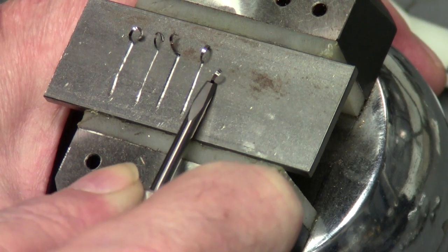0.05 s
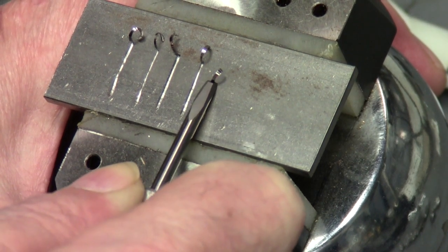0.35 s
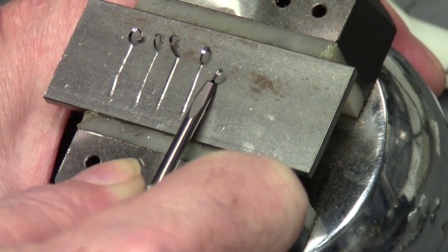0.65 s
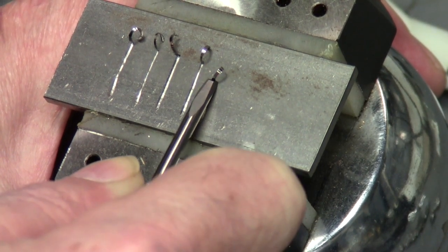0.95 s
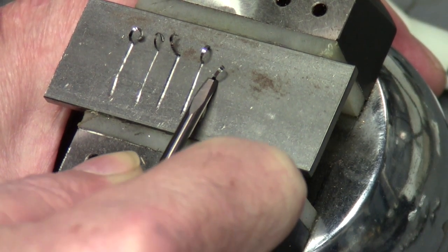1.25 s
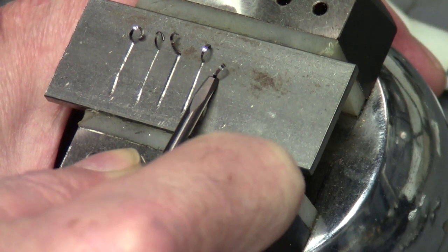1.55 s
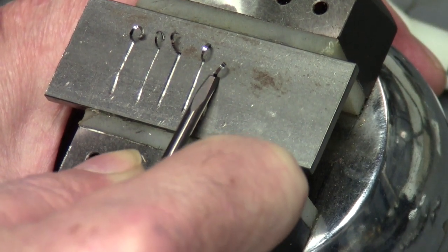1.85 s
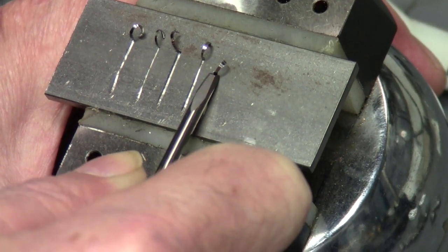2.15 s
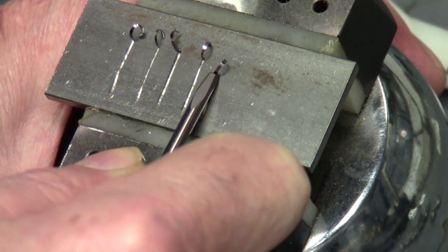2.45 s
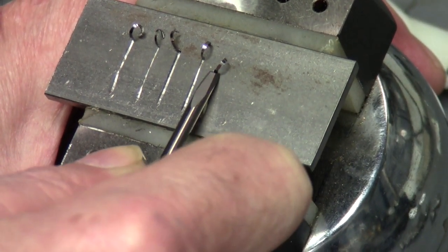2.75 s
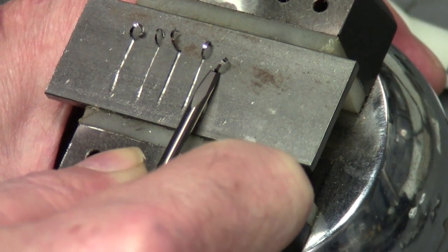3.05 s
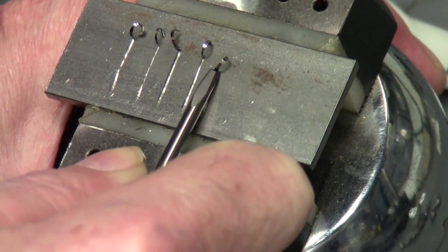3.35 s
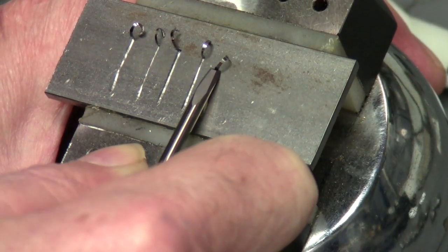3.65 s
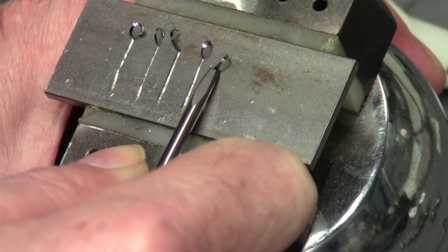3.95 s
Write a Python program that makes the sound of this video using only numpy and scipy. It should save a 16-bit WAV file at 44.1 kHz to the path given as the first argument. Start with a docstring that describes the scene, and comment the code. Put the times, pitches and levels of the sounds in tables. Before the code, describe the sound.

An air-powered engraving tool hammers rapidly on steel, a steady metallic buzz with hiss.

```python
"""Air graver on steel

An air-driven graver hammers about 42 times a second on a small steel plate in a vise, close up.
Each blow chatters, knocks the vise and rings the tip and the plate, which swell and fade as the
point cuts. Between blows the valve puffs out pulsing air, which throbs about ten times a second
over a steady hiss and a low hum."""
import sys
import numpy as np
from scipy import signal
from scipy.fft import rfft, irfft
from scipy.io import wavfile
from scipy.ndimage import uniform_filter1d

SR = 44100
rng = np.random.default_rng(int(sys.argv[2]) if len(sys.argv) > 2 else 0)


def file_out(sig):
    """Save sig as 16-bit WAV at sys.argv[1]."""
    # one column per channel
    cols = np.atleast_2d(sig).T
    # limit, then scale
    lim = np.clip(cols, -1, 1)
    pcm = np.round(lim * 32767).astype(np.int16)
    wavfile.write(sys.argv[1], SR, pcm)


N = 176400

BLOW_HZ, PUMP_HZ = 42.133, 136.18  # the pump beats against three times the blow rate: the throb
FIRST_BLOW_S, FIRST_PUMP_S = -.0004, .005
VALVE_LEAD_S = 0.004206  # the valve is widest open this long before a blow


def amp(db):
    """Decibels to amplitude."""
    return 10 ** (np.asarray(db) / 20)


def unit_rms(x):
    """Scale a signal to an RMS of one."""
    return x / np.sqrt(np.mean(x ** 2) + 1e-20)


def curve_at(points, hz):
    """Read a curve along a log frequency axis."""
    f, value = np.transpose(points)
    return np.interp(np.log(hz + 1), np.log(f + 1), value)


def wander(count, span):
    """Smooth random drift, one value per blow."""
    return unit_rms(uniform_filter1d(uniform_filter1d(rng.standard_normal(count), span), span))


def clicks(times, sizes):
    """One click of the given size at each time, placed between samples."""
    at = np.round(times * SR).astype(int)[:, None] + np.arange(-8, 9)
    offset = at - times[:, None] * SR
    shapes = sizes[:, None] * np.sinc(offset) * np.sinc(offset / 9)
    inside = (at >= 0) & (at < N)
    return np.bincount(at[inside], shapes[inside], N)


def noise_bursts(drive, decay_s):
    """Every click sets off a dying burst of noise."""
    envelope = signal.lfilter([1], [1, -np.exp(-1 / (decay_s * SR))], drive)
    return unit_rms(envelope * rng.standard_normal(N))


def coloured(x, colour, modes=(), size=8192):
    """Minimum-phase filter: a broad colour with resonances standing on it."""
    hz = abs(np.fft.fftfreq(size, 1 / SR))
    power = amp(curve_at(colour, hz)) ** 2
    for f, width, db in modes:
        detune = 2 * (hz - f) / width
        power += amp(db) ** 2 / (1 + detune ** 2) / (1 + (detune / 5) ** 2)
    log_spectrum = signal.hilbert(np.log(power) / 2).conj()
    response = np.fft.ifft(np.exp(log_spectrum)).real
    return signal.oaconvolve(x, response[:size // 2])[:N]


def echoes(x, t60, length_s):
    """A dense spray of reflections, each band dying at its own speed."""
    hz, t, bands = signal.stft(rng.standard_normal(SR), SR, nperseg=128)
    decay = amp(-60 * t / curve_at(t60, hz)[:, None])
    tail = signal.istft(bands * decay, SR, nperseg=128)[1][:int(length_s * SR)]
    spectrum = rfft(tail, 2 * SR)
    spectrum /= np.sqrt(uniform_filter1d(abs(spectrum) ** 2, size=400) + 1e-12)  # neutral in tone
    return signal.oaconvolve(x, irfft(spectrum)[:len(tail)])[:N]


def in_room(x, wet_db):
    """Direct sound plus the workshop's tail, at unit level."""
    # workshop decay: f/Hz, t60/s
    room_t60 = [(150, .35), (1000, .35), (4000, .26), (10000, .2), (16000, .12)]
    return unit_rms(x + amp(wet_db) * echoes(x, room_t60, length_s=.2))


def cycle_times():
    """The piston's even beat, in seconds."""
    return FIRST_BLOW_S + np.arange(int(N / SR * BLOW_HZ) + 2) / BLOW_HZ


def through_shank(x, feedback=0.47):
    """Quick round trips in the shank smear a click without changing its colour."""
    # round trips: t/s
    trips = [.00005, .00007, .00011]
    for trip_s in trips:
        loop = np.r_[1, np.zeros(round(trip_s * SR)), feedback]
        x = signal.lfilter(loop[::-1], loop, x)
    return x


def chatter(times, levels, part, scatter_db, grit, grit_s):
    """Each blow is three quick contacts with grit as the point cuts. Gives the drive and RMS force."""
    # contacts within a blow: delay/ms, tip level/dB, plate level/dB
    contacts = [(0, 3.5, 8), (1.402, -1, -11), (2.202, -3, -12.5)]
    count = len(times)
    force = amp(np.interp(times, *np.transpose(levels)) + scatter_db * rng.standard_normal(count))
    hits = np.zeros(N)
    for ms, tip_db, plate_db in contacts:
        delay_s = ms / 1000 * (1 + .006 * wander(count, span=6))
        contact_db = (tip_db if part == "tip" else plate_db) + 0.28 * rng.standard_normal(count)
        hits += clicks(times + delay_s, force * amp(contact_db))
    drive = unit_rms(through_shank(hits)) + grit * noise_bursts(hits, grit_s)
    return drive, np.sqrt(np.mean(force ** 2))


def tip_ring(times):
    """The steel tip rings brightly; the clamped steel in the vise adds a dense, short tail."""
    # force on the tip: t/s, level/dB
    levels = [(0.0, -19), (0.14, -25), (0.66, -23.5), (0.78, -24.5), (0.83, -23.5), (0.88, -25.4),
              (1.19, -21.5), (1.54, -23.5), (1.8, -22), (1.97, -23.5), (2.3, -24), (2.66, -22.5),
              (3.16, -24.5), (3.3, -22.5), (3.39, -24), (3.42, -23.5), (3.96, -22)]
    # broad tone: f/Hz, level/dB
    colour = [(300, -63), (1300, -30), (2100, -20), (2900, -13), (4300, -12.5), (4800, -10), (5300, -11),
              (6500, -12.5), (7300, -10.5), (9500, -13.5), (11000, -24), (12300, -22), (13400, -18.5),
              (14500, -57), (16000, -86)]
    # tip resonances: f/Hz, width/Hz, level/dB
    modes = [(6900, 51, -19), (6960, 110, -4), (7840, 500, -4), (8180, 90, -3.5), (8490, 70, -0.5),
             (9000, 81, 2), (9100, 120, -3.5), (9400, 88, 0.5), (9730, 200, -6)]
    # vise decay: f/Hz, t60/s
    vise_t60 = [(500, 0.019), (3000, 0.035), (8000, 0.026), (16000, 0.033)]
    drive, level = chatter(times, levels, "tip", scatter_db=0.27, grit=0.9, grit_s=0.0021)
    ring = coloured(drive, colour, modes)
    ring += amp(-13) * echoes(ring, vise_t60, length_s=.08)
    return level * amp(1.38) * in_room(ring, wet_db=-11.5)


def tip_sheen(times):
    """The highest ring of each blow, a sheen above 10 kHz with swells of its own."""
    # force behind the sheen: t/s, level/dB
    levels = [(0.0, -28), (0.47, -24), (0.52, -26.5), (0.71, -24.8), (0.78, -28), (0.83, -24), (0.9, -35),
              (1.19, -23.5), (1.42, -28.0), (1.52, -27), (1.66, -31.5), (1.85, -27.5), (2.28, -22.5),
              (2.3, -28.0), (2.44, -30.5), (2.49, -23.5), (2.9, -25), (3.73, -23), (3.8, -31), (3.96, -22)]
    # broad tone: f/Hz, level/dB
    colour = [(300, -92), (7000, -63), (9600, -21), (11000, -16), (12500, -33), (16000, -63)]
    # highest resonances: f/Hz, width/Hz, level/dB
    modes = [(10050, 255, 2.5), (10580, 320, 0), (11500, 360, -7)]
    drive, level = chatter(times, levels, "tip", scatter_db=0.5, grit=0.32, grit_s=0.0006)
    return level * in_room(coloured(drive, colour, modes), wet_db=-11.5)


def plate_ring(times):
    """The plate rings lower than the tip, and the bench returns an early echo."""
    # force on the plate: t/s, level/dB
    levels = [(0.0, -27), (0.14, -29.5), (0.17, -25.5), (0.24, -30), (0.31, -26.5), (0.5, -35),
              (0.76, -23.5), (0.78, -34), (0.81, -26), (0.9, -27.5), (1.26, -30), (1.4, -34.5),
              (1.47, -24.5), (1.61, -28), (1.88, -26), (1.97, -41), (1.99, -22), (2.04, -33.5), (2.16, -27),
              (2.21, -34.7), (2.23, -25), (2.35, -30), (2.42, -24.5), (2.61, -30.5), (2.85, -35),
              (2.87, -25.9), (3.16, -27.3), (3.18, -38), (3.2, -27.5), (3.51, -35.5), (3.7, -28),
              (3.96, -28)]
    # broad tone: f/Hz, level/dB
    colour = [(300, -29), (1000, -40), (2100, -33), (3200, -30), (4300, -32), (7000, -48.5), (16000, -61)]
    # plate resonances: f/Hz, width/Hz, level/dB
    modes = [(2650, 38, -18.5), (2903, 49, -3), (3320, 80, -10), (3520, 160, 2), (3671, 109, 6),
             (3900, 36, -8)]
    drive, level = chatter(times, levels, "plate", scatter_db=1.3, grit=0.64, grit_s=0.0011)
    ring = coloured(drive, colour, modes)
    bench_echo = np.interp(np.arange(N) - .00384 * SR, np.arange(N), ring, left=0)
    return level * amp(1.14) * in_room(ring + amp(-5) * bench_echo, wet_db=-15.5)


def vise_knock(times, swell_every_s=0.744, swell_peak_s=0.25):
    """Every blow knocks dully in the vise, with a faint ring that swells and fades."""
    # early echoes: delay/s, level/dB
    early = [(.0029, -4.5), (.0066, -10.5)]
    # dull body of the knock: f/Hz, level/dB
    colour = [(60, -46), (300, -11), (700, 0.5), (1000, -2), (1350, -14.5), (2100, -7.5), (3000, -14),
              (16000, -66)]
    # knock resonances: f/Hz, width/Hz, level/dB
    modes = [(1765, 223, -0.5), (2030, 72, -14.5)]
    # faint ring: f/Hz, width/Hz, level/dB
    swell_modes = [(2284, 51, 3), (2420, 100, -10)]
    force = amp(0.89 * rng.standard_normal(len(times)))
    drive = clicks(times, force) + sum(clicks(times + s, force * amp(db)) for s, db in early)
    knock = in_room(coloured(drive, colour, modes), wet_db=-11.5)
    swell = amp(10 * np.cos(2 * np.pi * (times - swell_peak_s) / swell_every_s))
    ring = coloured(clicks(times, force * swell), [(20, -60), (16000, -60)], swell_modes)
    return amp(-35.5) * knock + amp(-46) * unit_rms(ring)


def graver(drift_s=.00008, jitter_s=.00001):
    """The piston's slightly uneven blows sound the tip, plate and vise together."""
    times = cycle_times()
    times += drift_s * wander(len(times), span=14) + jitter_s * rng.standard_normal(len(times))
    return tip_ring(times) + tip_sheen(times) + plate_ring(times) + vise_knock(times)


def valve_puffs(throb=0.3, swing_s=0.00095, jitter_s=0.00013):
    """Two soft puffs a cycle, their strength and timing swayed by the pulsing supply."""
    # puffs around each blow: delay/ms, level/dB
    puffs = [(-4, 6), (8, 5.5)]
    # soft, low tone: f/Hz, level/dB
    colour = [(30, -62), (100, -47), (190, 0), (260, -3.5), (340, 0.5), (415, -2), (520, -6.5), (800, -10),
              (1500, -24.5), (16000, -67)]
    times = cycle_times()
    pump_phase = 2 * np.pi * PUMP_HZ * (times - VALVE_LEAD_S - FIRST_PUMP_S)
    force = 1 + throb * np.cos(pump_phase)
    times += swing_s * np.sin(pump_phase) + jitter_s * rng.standard_normal(len(times))
    drive = sum(clicks(times + ms / 1000, force * amp(db)) for ms, db in puffs)
    return amp(-35) * in_room(coloured(drive, colour), wet_db=-9)


def exhaust(open_width_s=0.0027, jitter_s=0.00012):
    """Supply pulses escape as turbulent bursts while the valve is open, rattling along the hose."""
    # hollow tone of the air: f/Hz, level/dB
    colour = [(30, -45.5), (200, -16.5), (400, 2.5), (560, -3), (680, 4.5), (800, -2), (900, -9.5),
              (1060, -11), (1250, -12.5), (1750, -11), (3000, -15), (16000, -53)]
    # hose decay: f/Hz, t60/s
    hose_t60 = [(200, 0.053), (1000, 0.018), (16000, 0.012)]
    times = FIRST_PUMP_S + np.arange(int(N / SR * PUMP_HZ)) / PUMP_HZ
    valve_cycles = (times + VALVE_LEAD_S - FIRST_BLOW_S) * BLOW_HZ
    from_open_s = ((valve_cycles + .5) % 1 - .5) / BLOW_HZ
    opening = np.exp(-(from_open_s / open_width_s) ** 2 / 2)
    force = opening * amp(0.39 * rng.standard_normal(len(times)))
    pulses = clicks(times + jitter_s * rng.standard_normal(len(times)), force)
    air = coloured(unit_rms(pulses) + noise_bursts(pulses, decay_s=0.0022), colour)
    air += amp(-2) * echoes(air, hose_t60, length_s=.08)
    return amp(-34) * in_room(air, wet_db=-8.5)


def leak_hiss():
    """Air leaks steadily from the handpiece."""
    # tone of the leak: f/Hz, level/dB
    colour = [(100, -22), (700, -4), (1300, -6.5), (1750, -5), (2100, -6.5), (2900, 4), (4300, -4),
              (5600, -8.5), (7300, -8), (9500, -3.5), (12000, -8.5), (14000, -24), (16000, -54)]
    # its resonance: f/Hz, width/Hz, level/dB
    modes = [(6310, 570, 2.3)]
    return amp(-29) * unit_rms(coloured(rng.standard_normal(N), colour, modes))


def drive_hum():
    """The air drive hums at multiples of the blow and pump rates and at their beats."""
    # tones: multiple of the blow rate, multiple of the pump rate, level/dB
    tones = [(1, 0, -70), (2, 0, -50), (3, 0, -43.5), (0, 1, -44), (10, -2, -45.5), (7, -1, -38),
             (4, 0, -54.5), (3, 1, -50.5), (10, -1, -42), (10, 0, -51), (19, 0, -49.5), (25, 0, -64.5),
             (18, -2, -53.5)]
    t = np.arange(N) / SR
    hum = np.zeros(N)
    for blow_multiple, pump_multiple, db in tones:
        hz = blow_multiple * BLOW_HZ + pump_multiple * PUMP_HZ
        hum += amp(db) * np.sqrt(2) * np.sin(2 * np.pi * (hz * t + rng.random()))
    return hum


def room_tone():
    """The workshop's low, steady bed of noise."""
    # background tone: f/Hz, level/dB
    colour = [(20, -36), (45, -13), (70, -19), (140, -2), (300, -4), (1000, -19), (5000, -17), (16000, -53)]
    return amp(-41.5) * unit_rms(coloured(rng.standard_normal(N), colour))


def scene():
    """The mix leans slightly left and is widest in the high treble."""
    # likeness of the two sides: f/Hz, correlation
    likeness = [(100, 0.97), (3000, 1), (6000, 0.9), (10000, 0.86), (13000, 0.17), (16000, 0.39)]
    # left over right: f/Hz, level/dB
    balance = [(60, 2), (150, 1.5), (300, 1), (650, 5), (1300, -0.3), (3000, 0.2), (5500, 0.9), (9500, 3),
               (12000, 6.5), (16000, -2)]
    mono = graver() + valve_puffs() + exhaust() + leak_hiss() + drive_hum() + room_tone()
    hz = np.fft.rfftfreq(N, 1 / SR)
    correlation = curve_at(likeness, hz)
    width = np.sqrt((1 - correlation) / (1 + correlation))
    lean = amp(curve_at(balance, hz) / 2)
    mid = rfft(mono)
    side = width * rfft(echoes(mono, t60=[(100, 0.0064), (16000, 0.015)], length_s=.02))
    return irfft(np.array([(mid + side) * lean, (mid - side) / lean]), N)


def record(dry):
    """Clip at full scale, then cut the treble above 16 kHz."""
    lowpass = signal.firwin(511, 16000, window=("kaiser", 9), fs=SR)
    return signal.oaconvolve(np.clip(dry, -1, 1), lowpass[None], "same")


dry = scene()
out = record(dry)
file_out(out)
```